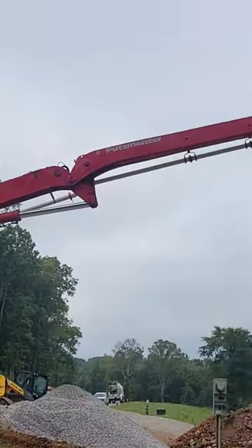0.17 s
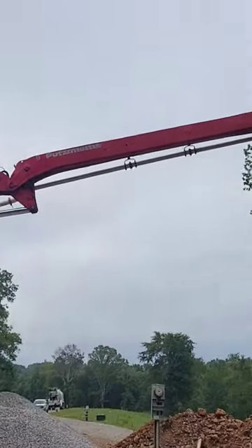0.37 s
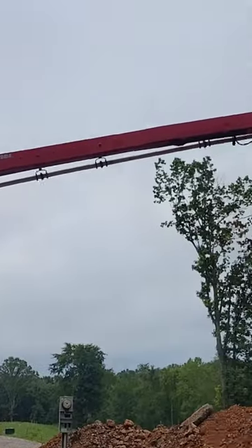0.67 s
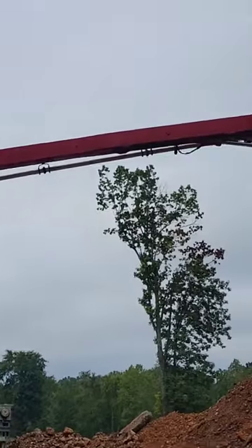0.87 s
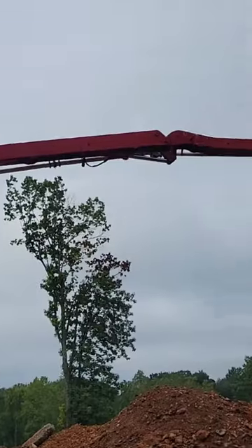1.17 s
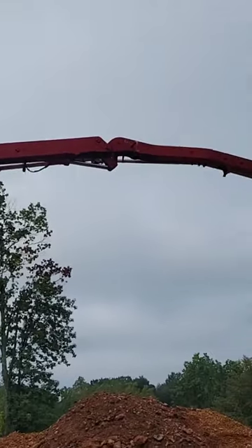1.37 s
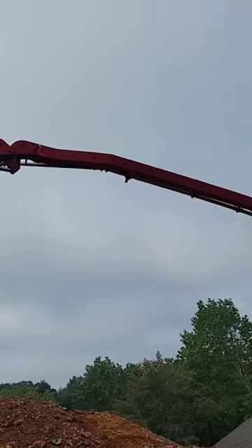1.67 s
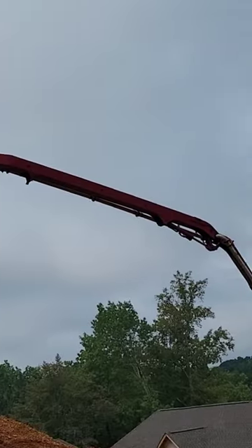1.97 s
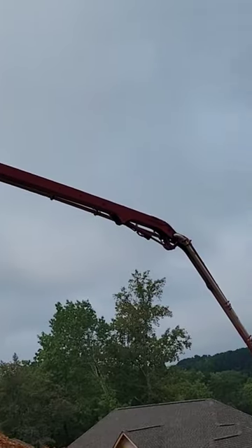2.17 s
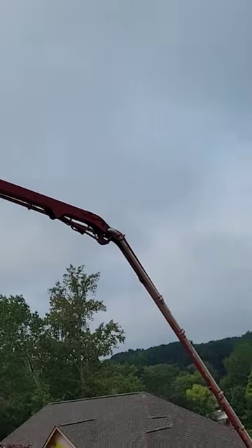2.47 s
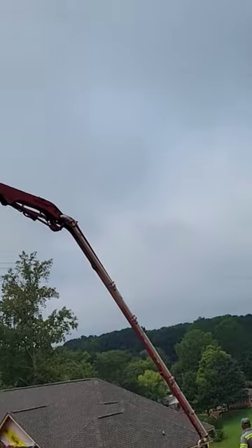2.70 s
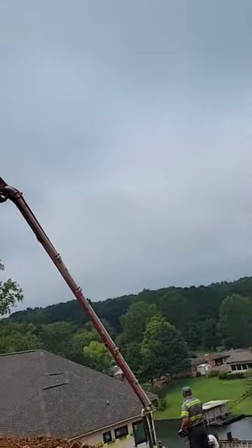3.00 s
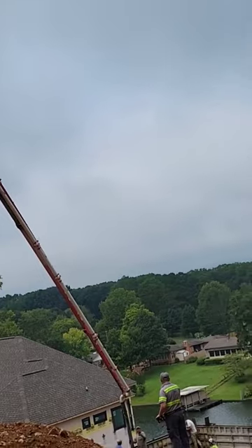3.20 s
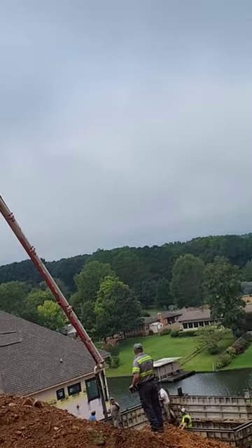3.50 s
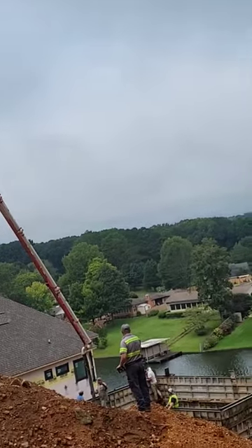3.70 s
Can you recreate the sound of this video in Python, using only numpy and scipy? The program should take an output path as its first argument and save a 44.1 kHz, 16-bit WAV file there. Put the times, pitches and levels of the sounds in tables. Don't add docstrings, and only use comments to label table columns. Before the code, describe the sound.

Continuous heavy engine drone and broadband machinery roar from a pump truck on an open site; a fan whine swells near one second then fades, with light wind buffeting on a handheld microphone.

```python
import sys
import numpy as np
from scipy import signal
from scipy.io import wavfile
from scipy.ndimage import uniform_filter1d

SR = 44100
rng = np.random.default_rng(int(sys.argv[2]) if len(sys.argv) > 2 else 0)


def store_wav(level_fs):
    pcm = np.round(np.clip(np.atleast_2d(level_fs), -1, 1) * 32767)
    wavfile.write(sys.argv[1], SR, pcm.T.astype(np.int16))


def makeup_ratio(level_db):
    decades = np.asarray(level_db, float) / 20
    return 10 ** decades


N = 169785
FRAME, HOP = 1024, 256


def evened(x):
    return x / np.sqrt(np.mean(x ** 2) + 1e-20)


def read(points, hz):
    f, value = np.transpose(points)
    return np.interp(np.log(hz + 1), np.log(f + 1), value)[:, None]


def curve(rows, t):
    times, *columns = np.transpose(rows)
    return [np.interp(t, times, column) for column in columns]


def drift(top_hz):
    f = np.geomspace(0.2, top_hz, 16)[:, None]
    phase = rng.random((16, 1))
    t = np.arange(0, N + 200, 200) / SR
    waves = np.sin(2 * np.pi * (f * t + phase)) / np.sqrt(f)
    return np.interp(np.arange(N) / SR, t, evened(waves.sum(0)))


def blotches(shape, bins, frames):
    across = uniform_filter1d(rng.standard_normal(shape), bins, axis=-2)
    return evened(uniform_filter1d(across, frames, axis=-1))


def tone(turns, db):
    return np.sqrt(2) * makeup_ratio(db) * np.sin(2 * np.pi * (turns + rng.random()))


def spectra(x):
    return signal.stft(x, SR, nperseg=FRAME, noverlap=FRAME - HOP)


def sound(z):
    return signal.istft(z, SR, nperseg=FRAME, noverlap=FRAME - HOP)[1][..., :N]


def engine_shaft(t):
    firing_hz = 80.04
    return firing_hz * t / 3 + 0.02 * drift(1.5)


def firing_tone(t, shaft):
    # (time [s], level [dB])
    firing_level = [
        (0, -17),
        (.15, -20),
        (.35, -18.5),
        (1.1, -13.5),
        (1.17, -19),
        (2.3, -19.5),
        (3.85, -19),
    ]
    return tone(3 * shaft, curve(firing_level, t)[0] - 0.27 * drift(8.0))


def shaft_tones(shaft):
    # (multiple of shaft speed, level [dB])
    low_orders = [(1, -66), (4, -36.5), (4.5, -44.5), (5, -45), (6, -47), (6.5, -44), (9, -51.5), (11, -45),
                  (12, -54), (13, -45), (14, -49.5), (15, -49)]
    high_orders = [(17, -51), (18.5, -50), (19, -47), (21, -51), (27, -52), (30, -42), (35, -52), (45, -47)]
    out = 0
    for multiple, db in [*low_orders, *high_orders]:
        order = np.round(2 * multiple) / 2
        out = out + tone(order * shaft, db - 0.5 * drift(4.1))
    return out


def pump_tones(t):
    # (pitch [Hz], level [dB], waver [dB])
    pump_whines = [(352, -43, 2), (430.3, -41, 2), (486, -50, 3), (700, -50, 4), (975, -53, 3),
                   (1760, -57, 3), (3562, -65, 3)]
    out = 0
    for hz, db, waver_db in pump_whines:
        out = out + tone(hz * t + 0.044 * drift(3.0), db + waver_db * drift(5.0))
    return out


def fan_whine(t):
    # (time [s], pitch [Hz], level [dB])
    fan_path = [
        (0, 752, -35),
        (.22, 744, -33.5),
        (.5, 750, -34.5),
        (1.05, 768, -30),
        (1.5, 770, -31),
        (2.5, 775, -35.5),
        (3.85, 781, -40.5),
    ]
    whine_hz, whine_db = curve(fan_path, t)
    return tone(np.cumsum(whine_hz) / SR + 0.03 * drift(4.0), whine_db + 0.9 * drift(6.0))


def clatter(shaft, hz, turn):
    # (frequency [Hz], level [dB per Hz])
    roar_facing = [(25, -64.5), (70, -46.5), (200, -53), (600, -59), (900, -62.5), (2000, -64.5),
                   (4500, -81.5), (7200, -89)]
    roar_away = [(25, -68), (70, -54.5), (200, -61.5), (600, -60.5), (900, -64), (1600, -74), (4500, -77),
                 (7200, -92.5)]
    # (pitch [Hz], width [Hz], level [dB], turn where loudest [0-1], loss off that aim [dB])
    panels = [(747, 140, -56, 0.13, 1.5), (365, 48, -54.5, 1, 7.5), (553, 110, -53, 0.02, 37),
              (1270, 120, -62.5, .3, 15.5), (2433, 363, -62, 0.34, 3.5), (2963, 380, -67.5, 0.51, 10.5),
              (3565, 830, -66.5, 0.34, 11.5), (4730, 450, -76, 0.57, 6.5), (5429, 180, -80, 1, 8.5),
              (6290, 500, -76, 0.15, 15.5), (6150, 340, -74.5, 1, 18.5)]

    knock = np.exp(-(3 * shaft % 1) / 0.4) * makeup_ratio(2.1 * drift(30.0))
    loudness = evened(1 + 0.14 * knock / knock.mean())
    z = spectra(rng.standard_normal((2, N)) * loudness)[2]

    rows = hz[:, None]
    roar_db = read(roar_facing, hz) * (1 - turn) + read(roar_away, hz) * turn
    power = makeup_ratio(2 * roar_db)
    for f, width, db, aim, loss_db in panels:
        peak = makeup_ratio(2 * (db - loss_db * 3.74 * (turn - aim) ** 2))
        power = power + peak / (1 + (2 * (rows - f) / width) ** 2) ** 2

    patches = blotches(power.shape, 10, 12)
    swell = evened(uniform_filter1d(rng.standard_normal(power.shape[1]), 25))
    rattle = blotches(power.shape, 24, 7)
    patches = patches + 0.87 * rattle * (rows > 1800)
    roll_db = -8 * np.maximum(rows - 6830, 0) / 1000
    return z * np.sqrt(power * SR / 2) * makeup_ratio(1.12 * patches + 0.18 * swell + roll_db)


def wind(t):
    low_band = signal.butter(2, [30, 122], "band", fs=SR, output="sos")
    low = signal.sosfilt(low_band, rng.standard_normal((2, N)))
    lumps = np.array([drift(34.0), drift(36.0)])
    fade_db = -11.5 * (1 - np.exp(-t / 0.3))
    return evened(low) * makeup_ratio(-31 + fade_db + 2.5 * lumps)


def by_bearing(rows, hz, turn):
    facing, halfway, away = (read(np.array(rows)[:, [0, k]], hz) for k in (1, 2, 3))
    first_half = (facing - halfway) * np.maximum(1 - 2 * turn, 0)
    second_half = (away - halfway) * np.maximum(2 * turn - 1, 0)
    return halfway + first_half + second_half


def scene():
    # (time [s], lead of the left port [ms])
    turn_path = [
        (0, 0.2),
        (.5, 0.22),
        (.9, 0.29),
        (1.6, 0.37),
        (2.3, .44),
        (2.9, 0.49),
        (3.85, 0.5),
    ]
    # (frequency [Hz], facing [ms], halfway [ms], away [ms])
    bend = [(80.4, 0.63, 0.54, 0.39), (170, -0.06, -0.084, 0.17), (427, 0.37, 0.43, 0.33),
            (775, 0.13, 0.077, 0.072), (1070, 0.081, 0.1, -0.081), (1580, 0.06, 0.018, -0.04),
            (2315, 0.095, 0.26, .09), (3615, -0.049, 0.013, -0.018)]
    # (frequency [Hz], facing [dB], halfway [dB], away [dB])
    shade = [(170, 0.3, 0.2, 0.7), (775, -1.6, -0.7, -1.8), (1070, 0, 3.5, 2.1), (1754, -1.1, 2.5, 6),
             (2700, -7, -15.5, -5), (3850, -1.8, -3, -4.5), (4850, 2.5, -5.5, -10.5),
             (6200, -14.5, -7, -10)]
    # (frequency [Hz], likeness [0-1])
    likeness = [(30, .5), (100, 0.95), (500, 0.86), (1100, 0.94), (1650, 0.78), (2500, 0.7), (5000, 0.63),
                (8000, 0)]

    t = np.arange(N) / SR
    shaft = engine_shaft(t)
    tones = firing_tone(t, shaft) + shaft_tones(shaft) + pump_tones(t) + fan_whine(t)
    hz, frame_s, lines = spectra(tones)
    lead_ms = curve(turn_path, frame_s)[0]
    turn = np.clip((lead_ms - 0.21) / 0.3, 0, 1)
    direct, spread = clatter(shaft, hz, turn)

    same = np.clip(read(likeness, hz), 0, 1)
    right_clatter = same * direct + np.sqrt(1 - same ** 2) * spread
    delay_s = (lead_ms + by_bearing(bend, hz, turn)) / 1000
    later = makeup_ratio(by_bearing(shade, hz, turn)) * np.exp(-2j * np.pi * hz[:, None] * delay_s)
    right = later * (lines + right_clatter)
    return sound(np.array([lines + direct, right])) + wind(t)


def self_noise():
    # (frequency [Hz], level [dB per Hz])
    hiss_colour = [(5000, -115), (8200, -114), (9000, -101), (10000, -93), (11500, -90.5), (14000, -90),
                   (16000, -89)]
    hz, frame_s, z = spectra(rng.standard_normal((2, N)))
    patches = blotches(z.shape, 30, 50)
    sink_db = -2 * frame_s / 4
    z = z * makeup_ratio(read(hiss_colour, hz) + sink_db + 1.7 * patches)
    z = z * (hz < 15480)[:, None]
    port_db = -12 * np.arange(2)[:, None]
    return np.sqrt(SR / 2) * sound(z) * makeup_ratio(port_db)


def roll_off(x):
    return signal.sosfilt(signal.butter(12, 15480, fs=SR, output="sos"), x)


def record(dry):
    return roll_off(dry + self_noise())


dry = scene()
out = record(dry)
store_wav(out)
```